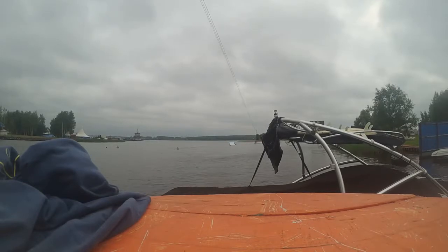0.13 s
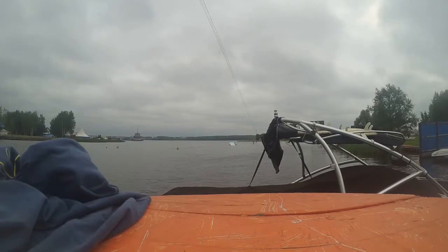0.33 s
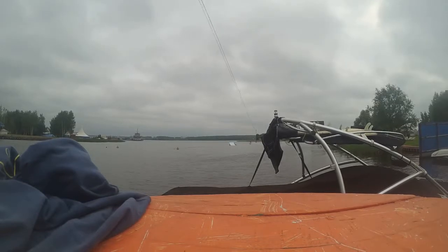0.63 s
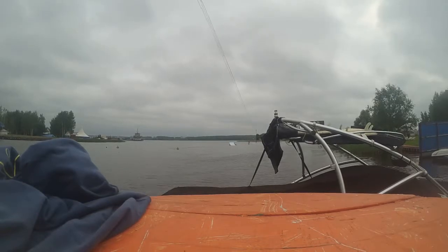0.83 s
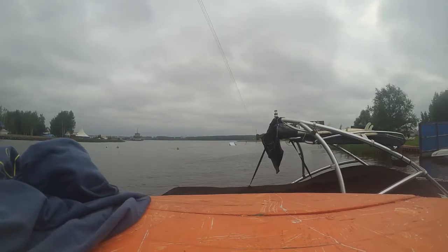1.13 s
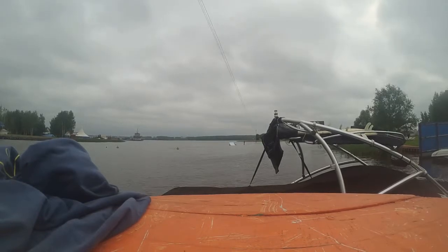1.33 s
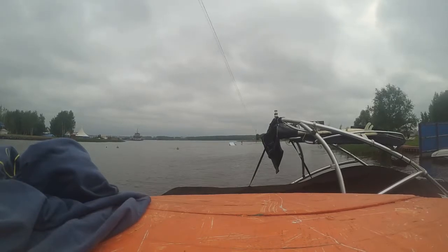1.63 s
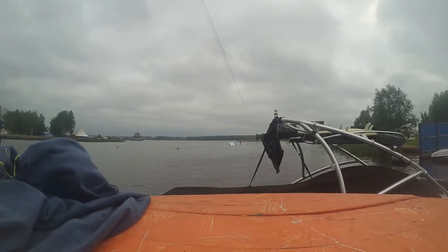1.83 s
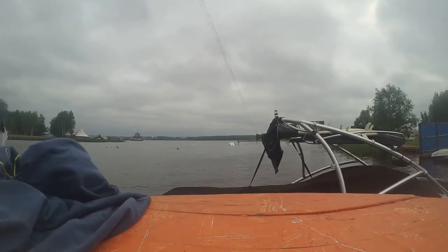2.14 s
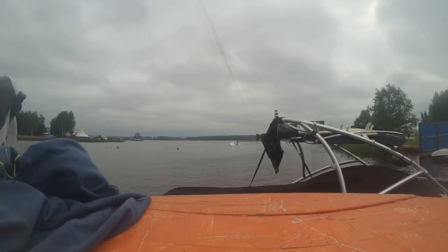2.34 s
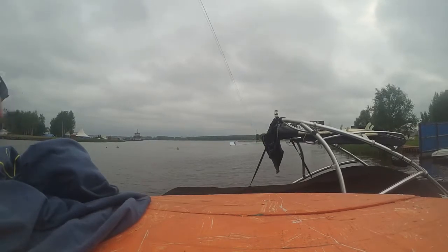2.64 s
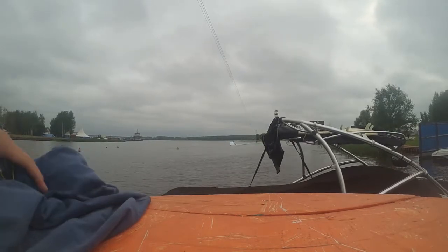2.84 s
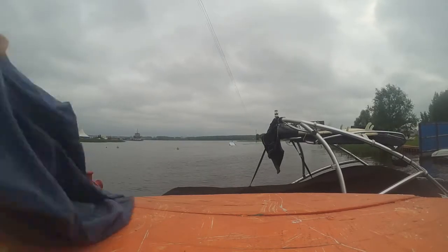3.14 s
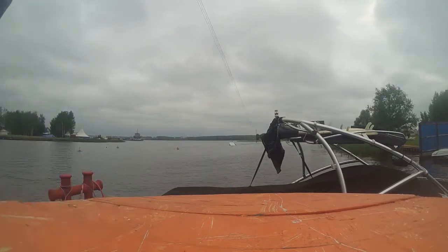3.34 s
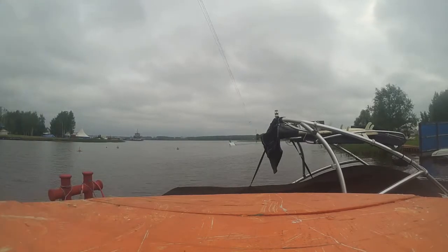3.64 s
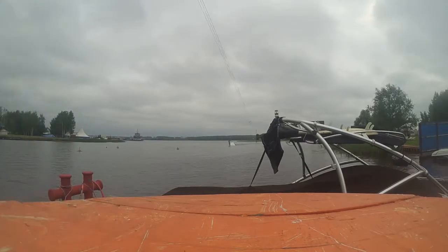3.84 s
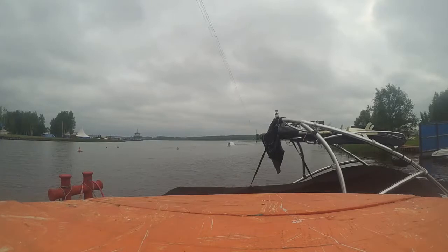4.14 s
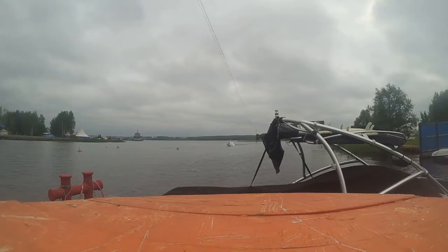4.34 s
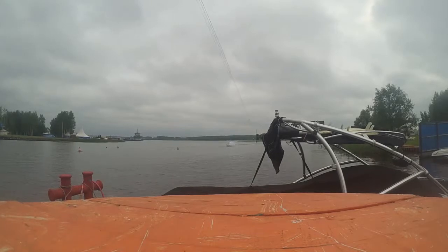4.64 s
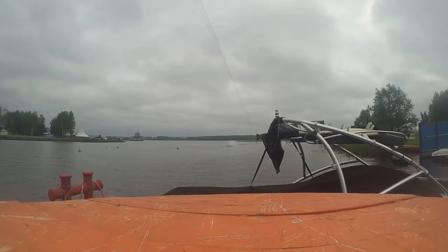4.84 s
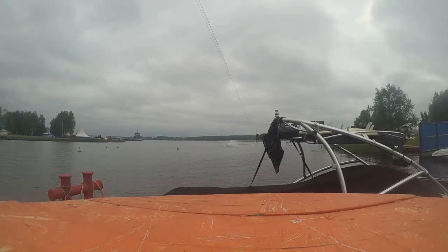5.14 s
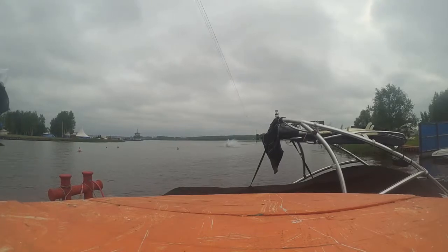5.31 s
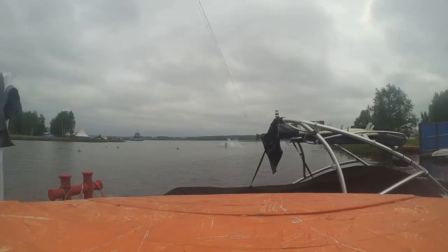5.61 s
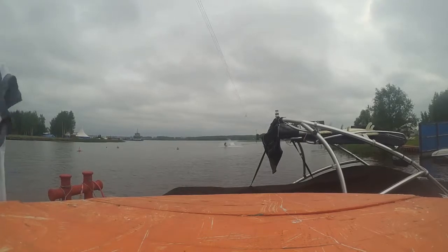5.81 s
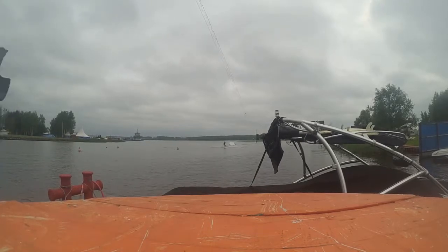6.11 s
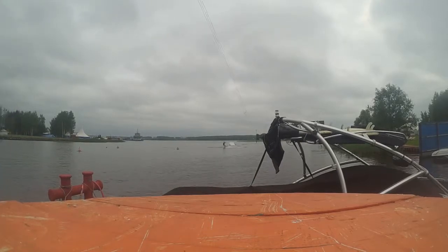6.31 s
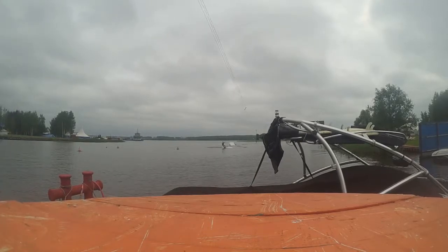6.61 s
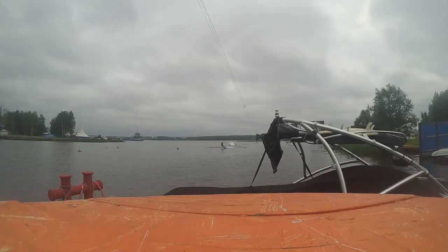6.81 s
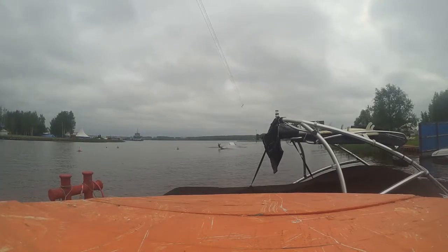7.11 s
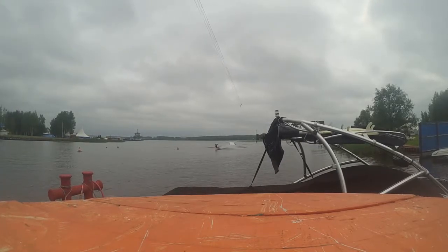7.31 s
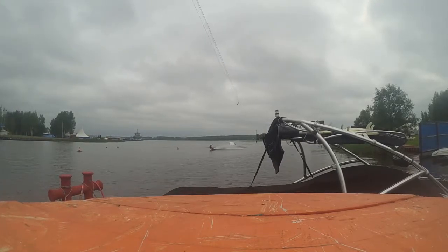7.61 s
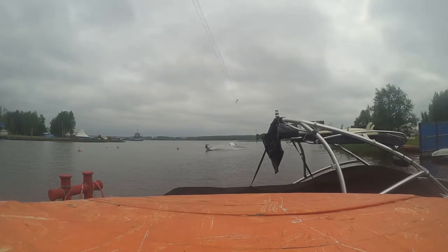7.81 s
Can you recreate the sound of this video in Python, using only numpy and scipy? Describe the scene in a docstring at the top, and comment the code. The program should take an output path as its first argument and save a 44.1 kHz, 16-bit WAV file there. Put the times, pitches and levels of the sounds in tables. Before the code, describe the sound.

Lake water booms and gulps under a hollow pontoon, with a low rumble, a brief cloth scrape and a few louder slaps.

```python
"""Lake water laps under a hollow floating pontoon, heard by a cased camera resting on its deck.
From the start, waves boom in the hull, trapped air gulps and the float rocks with a low rumble, over
lake hiss, ticking droplets and a thin electronic whine. Near 3 s a jacket is dragged off the deck: it
rasps, squeaks, catches and thumps. From 4 s the biggest waves slap the shell and the float knocks against
its mooring. Then the water settles: far spray swells, and softer booms and gulps close the scene."""
import sys
import numpy as np
from scipy import signal
from scipy.fft import rfft, irfft
from scipy.io import wavfile
from scipy.ndimage import uniform_filter1d

SR = 44100
rng = np.random.default_rng(int(sys.argv[2]) if len(sys.argv) > 2 else 0)


def put_to_file(sound):
    """Save the sound as 16-bit audio at rate SR, in the file named by the first command-line argument."""
    columns = np.atleast_2d(sound).T  # one column per channel
    safe = np.clip(columns, -1, 1)
    whole_steps = np.round(safe * 32767)
    wavfile.write(sys.argv[1], SR, whole_steps.astype(np.int16))


N = 350902
TIME = np.arange(N) / SR
FREQ = np.maximum(np.fft.rfftfreq(N, 1 / SR), .1)

# Event levels are cue levels; a function's trim_db settings ride on top of them.
# low booms of the float, from waves pushing under it and the jacket's thump near 3.3 s:
# start_s, push_s, hollow_db, hull_db, panel_db
BOOMS = [(0.275, 0.25, -53, -50.5, -56), (0.99, 0.22, -52, -56, -62), (1.145, 0.078, -41, -34.5, -41),
         (1.21, 0.13, -37, -48, -47), (1.32, 0.15, -43.5, -47, -50.5), (1.56, 0.13, -46.5, -48.5, -58),
         (1.892, 0.12, -59, -54, -66), (2.19, 0.069, -59, -56.5, -61), (2.33, 0.11, -52, -63, -73),
         (2.56, 0.12, -55, -56, -57), (2.8, 0.11, -50.5, -57.5, -61), (3.04, 0.28, -55, -59.5, -64),
         (3.29, 0.075, -46, -47, -47), (3.67, 0.016, -46, -62, -79), (3.99, 0.055, -46.5, -55, -63),
         (4.13, 0.045, -42, -42.5, -41.5), (4.26, 0.082, -47.5, -52, -67), (4.39, 0.058, -48.5, -43, -45),
         (4.51, 0.13, -36.5, -34, -24), (4.61, 0.2, -36, -33, -35), (4.85, 0.034, -46, -50, -69),
         (5.01, 0.039, -45, -61, -63), (5.208, 0.11, -43, -66, -55.5), (5.461, 0.098, -47, -71, -74),
         (6.18, 0.037, -55.5, -62, -74), (6.295, 0.1, -55.5, -53, -52), (6.459, 0.1, -46.5, -43.5, -54),
         (6.892, 0.1, -48, -50, -64), (6.98, 0.26, -42, -46.5, -61), (7.12, 0.11, -47, -43.5, -59),
         (7.775, 0.1, -50.5, -48.5, -54.5)]
# boom of the air inside the float: pitch_hz, width_hz, gain_db
HOLLOW_MODES = [(130.33, 8.9, -1), (153, 2.2, -13)]
# deep heave of the hull: pitch_hz, width_hz, gain_db
HULL_MODES = [(73.1, 8.9, 6), (96.2, 11.8, 0.78)]
# drumming of the panels: pitch_hz, width_hz, gain_db
PANEL_MODES = [(161.8, 13.8, -3.5), (191.6, 9.7, -2.5)]
# stiff ribs that speak under hard blows: pitch_hz, width_hz, gain_db
RIB_MODES = [(182, 29, 9), (206.7, 23.3, 1), (239, 210, -3)]
# squeezed air pockets: start_s, level_db, first_hz, last_hz, rise_s, hold_s, t60_s
GULPS = [(0.272, -41.5, 156, 135, 0.01, .016, .16), (0.412, -41, 162.7, 131.2, 0.0056, 0.014, 0.51),
         (1.157, -31.5, 186, 176.4, 0.0057, 0.034, 0.19), (1.182, -23, 144.4, 131.3, 0.014, 0.038, .09),
         (1.24, -22.5, 128.8, 132.4, 0.0074, .016, 0.33), (4.511, -30.5, 246, 217, 0.0091, 0.034, 0.044),
         (4.533, -22.5, 193, 215, 0.0055, 0.0275, 0.031), (4.581, -18.5, 229.5, 195, 0.014, 0.017, 0.073),
         (4.655, -33, 216, 190, .006, 0.038, 0.048), (4.727, -29, 224, 185, 0.0069, 0.029, 0.16),
         (4.739, -29, 137, 117, 0.011, 0.026, 0.075), (6.292, -40.5, 102.3, 96.8, 0.026, 0.12, 0.3),
         (6.36, -35.5, 136, 129.7, 0.063, 0.2, 0.2), (6.88, -38, 132.7, 127, 0.039, 0.1, .1),
         (6.975, -35.5, 132, 128.8, 0.014, 0.073, 0.35), (7.119, -41.5, 137.7, 130.2, 0.015, 0.15, 0.21),
         (7.775, -32, 126, 130.2, 0.025, 0.12, 0.2)]
# rolls as a swell passes under: start_s, length_s, level_db
ROLLS = [(0.26, 0.22, -33), (0.85, 0.14, -40), (1.18, 0.49, -37), (1.6, 0.16, -30.5), (2.2, 0.19, -40.5),
         (2.95, 0.29, -45), (5.33, 0.31, -42.5), (5.8, 0.23, -46.5), (6.95, .9, -46.5)]
# jolts that swing the whole float: start_s, level_db, pitch_hz, t60_s
JOLTS = [(0.293, -18, 30.2, 0.3), (0.412, -22, 33.7, 0.33), (1.37, -40, 29.3, 1), (1.616, -20, 29.7, 0.27),
         (1.652, -24.5, 31, 0.19), (3.345, -40, 38, 0.89), (4.143, -25.5, 34.8, 0.3),
         (4.228, -34, 36.54, 3.2), (4.56, -39, 37, 1), (5.865, -32, 25.2, 0.22), (6.449, -46, 40.3, 0.54)]
# sharp hits on the shell, from water slaps and the jacket catching on the deck near 3.3 s:
# start_s, crack_db, thump_db, t60_s, cutoff_hz
SHELL_HITS = [(0.35, -50.5, -63, 0.068, 1240), (1.166, -48.5, -39, 0.14, 1400),
              (1.655, -52, -40.5, 0.067, 1120), (1.76, -50.5, -48, 0.078, 1180),
              (1.811, -54, -54, 0.013, 1800), (1.921, -54.5, -67, 0.025, 1600),
              (1.977, -51.5, -64, 0.012, 1700), (3.279, -56, -57, 0.015, 2000),
              (3.293, -43, -42.5, 0.04, 2600), (3.325, -52.5, -45, 0.089, 1500),
              (4.02, -45.5, -53, 0.074, 2000), (4.046, -45, -45, 0.029, 1640),
              (4.098, -34, -66, 0.062, 3500), (4.115, -35.5, -37.5, 0.055, 3800),
              (4.144, -34.5, -54, 0.049, 2820), (4.166, -38, -56, 0.042, 1990),
              (4.405, -44.5, -47, 0.1, 1700), (4.511, -35.5, -45, 0.072, 1490),
              (4.534, -37, -39, 0.066, 1490), (4.546, -26.5, -26, 0.054, 1400),
              (4.574, -35, -45, 0.037, 1287), (4.597, -35, -34, 0.036, 1410),
              (4.617, -37.5, -25, 0.05, 1500), (4.656, -36, -39, 0.091, 1310),
              (4.723, -41.5, -35, 0.097, 1900), (4.789, -51, -45, 0.016, 1400)]
# ring of the struck shell: pitch_hz, width_hz, gain_db
SHELL_MODES = [(292.5, 23, 6.5), (546, 40, 3.5), (656, 44, -3), (837, 28, 4.5), (970, 117, 6.5),
               (1050, 55, -4), (1254, 62, -2.5), (1377, 49, -0.5), (1700, 190, -21), (2130, 92, -5.5),
               (2830, 180, -11)]
# bumps against the mooring: start_s, hollow_db, shell_db
KNOCKS = [(0.353, -60, -45), (1.658, -53, -47), (1.762, -53.5, -45.5), (4.046, -53, -40), (4.549, -30, -22),
          (4.726, -32, -49)]
# hollow ring of a bump: pitch_hz, width_hz, gain_db
KNOCK_MODES = [(282, 9.5, 14.5), (520, 36, 4.5), (1374, 51, -1)]
# water churning on the shell: start_s, length_s, level_db
CHURNS = [(0.36, .18, -67), (1.16, .02, -59), (3.99, 0.33, -62), (4.39, 0.17, -56.5), (4.52, .1, -43.5)]
# the jacket's drag and its sharper tugs: start_s, length_s, level_db
SCRAPES = [(2.97, .08, -69.5), (3.05, 0.32, -62.5), (3.095, 0.036, -61.5), (3.158, 0.027, -54.5),
           (3.235, .025, -61), (3.274, .01, -58)]
# rasp of the sliding cloth: pitch_hz, width_hz, gain_db
RASP_MODES = [(850, 150, 0), (1037, 190, 6.5), (1217, 90, -1), (1430, 110, -7), (1640, 95, -3.5),
              (2120, 160, -7.5)]
# the cloth catching on the deck: start_s, length_s, level_db, first_hz, last_hz
SQUEAKS = [(3.052, 0.076, -58, 1032, 1084), (3.095, 0.038, -57, 886, 800), (3.161, 0.033, -59, 1022, 1060),
           (3.161, 0.027, -56, 1660, 1540), (3.185, .055, -65, 2150, 2120), (3.218, 0.044, -64, 1030, 1070),
           (3.316, 0.03, -50, 1004, 1056), (3.337, .05, -60, 1040, 940)]
# plinking droplets: start_s, peak_db, pitch_hz, t60_s
DROPS = [(0.063, -53, 2980, 0.027), (0.185, -54, 2940, 0.033), (0.543, -55, 2960, .04),
         (1.082, -52, 3000, 0.017), (1.587, -57, 2870, .02), (2.162, -52, 3040, .025),
         (2.223, -55, 3060, 0.023), (2.652, -51, 2930, 0.028), (3.21, -57, 2850, .04),
         (3.244, -55, 2780, 0.035), (3.294, -55, 4000, .03), (4.116, -54, 3900, .04),
         (4.21, -50, 4820, .035), (4.22, -49.5, 2780, .03), (4.264, -55, 2800, .02),
         (4.803, -49.5, 3000, 0.043), (5.223, -52.5, 3015, 0.055), (5.883, -49.5, 2950, 0.027),
         (6.245, -52, 2930, .02), (6.654, -52, 3080, .02), (7.02, -52, 2930, 0.037),
         (7.264, -52, 3040, .025), (7.462, -52.5, 2900, .02)]
# drizzle ticking on the case: start_s, peak_db
TICKS = [(0.063, -52), (0.544, -52), (1.045, -50), (1.084, -55), (1.45, -57), (1.584, -55), (2.651, -51),
         (3.728, -52.5), (4.262, -52), (4.389, -59), (5.102, -54), (5.338, -54), (6.245, -52), (7.015, -53)]
# ring of a tick: pitch_hz, width_hz, gain_db
TICK_MODES = [(6100, 720, -6), (7080, 690, -1), (8460, 830, -3.5), (10800, 3400, -7)]
# EQ of the open lake's hiss: frequency_hz, gain_db
LAKE_EQ = [(100, 15.5), (330, -3), (750, -8.5), (1100, -1), (1700, -10.5), (2450, -10.5), (3900, -2),
           (4900, -1), (5500, -9.5), (7500, -12.5), (9300, -19.5), (15000, -37.5)]
# EQ of the spray: frequency_hz, gain_db
SPRAY_EQ = [(300, -20.5), (1100, -9.5), (1700, -13), (2500, -7.5), (3100, -12), (3900, 2.5), (4900, 0),
            (5500, -9), (6300, -6), (7500, -16), (9300, -15.5), (15000, -27.5)]
# fader curve of the far spray: time_s, level_db
FAR_SPRAY = [(0, -65.5), (1.0, -75.5), (2.9, -70), (3.25, -66), (3.6, -71.5), (4.7, -72.5), (5.4, -66.5),
             (5.9, -61.5), (6.5, -62), (7.25, -67.5), (7.7, -59.5), (7.96, -60)]
# spray falling back after the big waves: start_s, length_s, level_db
NEAR_SPRAY = [(4.18, 0.11, -62), (4.82, 0.1, -61)]
# stereo width of the hiss: frequency_hz, side_minus_mid_db
HISS_WIDTH = [(300, -25.5), (1400, -41.5), (2300, -38), (4000, -32), (6000, -20), (10000, -14.5),
              (14000, -14)]
# resonances of the camera case: centre_hz, width_hz, lift_db
CASE_EQ = [(417, 5.3, 17.5), (463.5, 13, 10.5), (548, 29.4, 13.5), (635, 15.6, 14.5), (990, 220, 8.5),
           (1205, 20, 12.5), (1443, 146, 15), (1840, 180, 6), (1955, 62, 10), (2140, 57, 8.5),
           (2906, 430, 10), (3770, 33, 7), (4630, 250, -5.5), (4895, 430, 5.5), (6880, 220, -2),
           (7340, 410, 9.5), (8840, 430, 1)]
# fader curve of the whine's strongest tone: time_s, rms_db
WHINE_FADER = [(0, -63), (1.05, -65.5), (1.35, -68), (1.75, -65.5), (2.15, -72.5), (2.7, -66.5),
               (3.55, -67), (3.7, -70.5), (4.15, -71.5), (4.55, -66.5), (4.95, -67.5), (5.35, -63.8),
               (6, -64), (7.15, -66.5), (7.7, -65), (7.96, -66.5)]
# the whine's weaker tones: pitch_hz, rms_db
WHINE_TONES = [(3978, -85), (4328, -85), (4409, -75), (4583, -83), (4665, -87), (4792, -84), (4872, -74.5),
               (5044, -84), (5335, -86), (5416, -87), (5590, -88), (6282, -86), (7434, -91), (9916, -83),
               (10088, -86.5), (10174, -88.5), (10460, -94), (10928, -94)]


def booming(hull_trim_db=-1, panel_trim_db=-3, hard_db=-21, slosh_db=1.73, slosh_hz=7):
    """Waves and one jacket thump drive the float's air, hull and panels; hard blows ring its ribs."""
    def ringing(modes):
        return steadied(filtered(noise(), body(modes, order=2)), span_s=0.028)
    def drive(levels_db, t60_s, ripple_db):  # small ripples keep it sounding between booms
        pushes = swells(zip(start_s, push_s, levels_db), rise_s=0.024, t60_s=t60_s)
        return np.hypot(pushes, undb(ripple_db))
    start_s, push_s, hollow_db, hull_db, panel_db = np.transpose(BOOMS)
    push = drive(hollow_db, t60_s=0.46, ripple_db=-61.5)
    heave = drive(hull_db, t60_s=0.38, ripple_db=-68)
    drum = drive(panel_db, t60_s=0.15, ripple_db=-73)
    boom = push * ringing(HOLLOW_MODES) + undb(hull_trim_db) * heave * ringing(HULL_MODES)
    hardness = np.sqrt(drum / (drum + undb(hard_db)))
    panels = (1 - hardness) * ringing(PANEL_MODES) + hardness * ringing(RIB_MODES)
    drumming = undb(panel_trim_db) * drum * panels
    slosh = undb(slosh_db * wobble(body([(slosh_hz, 9, 0)], order=2)))
    return filtered(slosh * boom + drumming, np.abs(lowpass(hz=268, order=10)))


def gulps(glide_s=0.022, flutter_db=0.6, jitter=0.011):
    """A trapped air pocket rings while the water squeezes it, its wavering pitch gliding to rest."""
    out, t = np.zeros(N), TIME[:SR]
    restless = wobble(body([(37.2, 30, 0)], order=2))
    for start_s, db, first_hz, last_hz, rise_s, hold_s, t60_s in GULPS:
        flutter, waver = shifted(restless)[:SR], shifted(restless)[:SR]
        glide_hz = last_hz + (first_hz - last_hz) * np.exp(-t / glide_s)
        squeeze = (1 - np.exp(-(t / rise_s) ** 2)) * fading(np.maximum(t - hold_s, 0), t60_s)
        tone = sine(glide_hz * (1 + jitter * waver))
        add(out, start_s, undb(db + flutter_db * flutter) * squeeze * tone)
    return out


def rocking(roll_trim_db=-2, calm_db=-50, jolt_rise_s=0.015):
    """The float wallows in the sub-bass with each roll and swings on its lowest mode after a jolt."""
    wallow = filtered(noise(), body([(6.4, 6.9, 0)]) * lowpass(hz=26.6, order=2))
    roll = np.hypot(swells(ROLLS, rise_s=0.045, t60_s=1.6), undb(calm_db))
    out = undb(roll_trim_db) * roll * steadied(wallow, span_s=0.23)
    t = TIME[:2 * SR]
    attack = 1 - np.exp(-(t / jolt_rise_s) ** 2)
    for start_s, db, hz, t60_s in JOLTS:
        add(out, start_s, undb(db) * attack * fading(t, t60_s) * np.sin(2 * np.pi * hz * t))
    return out


def shell_hits(shell, thump_trim_db=-2):
    """A water slap or a catch of the jacket cracks on the shell, duller if soft, and thumps the ribs."""
    crack = irfft(shell, N)[:SR // 4]
    thump = irfft(body(RIB_MODES) * body([(202, 590, 0)]) * lowpass(hz=283, order=4), N)
    out = np.zeros(N)
    for start_s, crack_db, thump_db, t60_s, cutoff_hz in SHELL_HITS:
        softened = signal.sosfilt(signal.butter(4, cutoff_hz, fs=SR, output="sos"), crack)
        add(out, start_s, undb(crack_db) * strike(softened, t60_s, rise_s=0.0029))
        add(out, start_s, undb(thump_db + thump_trim_db) * strike(thump, t60_s=0.0021))
    return out


def knocks(shell):
    """A bump on the mooring is one short push that rings the shell and leaves the hull ringing hollow."""
    def ring(response):
        impulse = irfft(response * lowpass(hz=1530, order=6), N)[:SR // 2]
        return impulse / np.abs(impulse).max()
    hollow = ring(body(KNOCK_MODES) * body([(557, 1000, 0)]))
    crack = ring(shell * body([(960, 430, 0)]))
    out = np.zeros(N)
    for start_s, hollow_db, shell_db in KNOCKS:
        add(out, start_s, undb(hollow_db) * hollow + undb(shell_db) * crack)
    return out


def churning(shell, trim_db=-3):
    """Churning water rattles the shell with a stream of tiny hits."""
    rattle = filtered(grains(per_s=980, spread_db=-1), shell * lowpass(hz=1630, order=4))
    return undb(trim_db) * swells(CHURNS, rise_s=0.01, t60_s=0.32) * steadied(rattle, span_s=0.043)


def jacket_drag(trim_db=-1):
    """Cloth rasps over the deck in dense little slips."""
    rasp = filtered(grains(per_s=420, spread_db=-2.5), body(RASP_MODES, order=2))
    return undb(trim_db) * swells(SCRAPES, rise_s=0.0068, t60_s=0.16) * steadied(rasp, span_s=0.032)


def jacket_squeaks(trim_db=-2, jitter=0.033):
    """The cloth catches on the deck and sings briefly on a shaky, sliding pitch."""
    out, unsteady = np.zeros(N), wobble(lowpass(hz=220, order=2))
    for start_s, length_s, db, first_hz, last_hz in SQUEAKS:
        along = np.linspace(0, 1, int(length_s * SR))
        shake = 1 + jitter * unsteady[int(start_s * SR):][:len(along)]
        glide_hz = first_hz + (last_hz - first_hz) * along
        add(out, start_s, undb(db + trim_db) * np.sin(np.pi * along) * sine(glide_hz * shake))
    return out


def droplets(fizz_db=-80):
    """Single drops plink briefly, with a faint fizz between them."""
    response = body([(2985, 230, 2.0), (7370, 610, -10)], order=2)
    out = undb(fizz_db) * unit(filtered(grains(per_s=70, spread_db=0.6), response))
    for start_s, db, hz, t60_s in DROPS:
        ring = irfft(body([(hz, 380, 0)], order=2), N)
        add(out, start_s, undb(db) * strike(ring, t60_s))
    return out


def drizzle(patter_db=-82):
    """Fine drops tick on the case: a few clear ones in a faint random patter."""
    response = body(TICK_MODES, order=2) * lowpass(hz=10000, order=6)
    out = undb(patter_db) * unit(filtered(grains(per_s=79, spread_db=-4.5), response))
    ring = irfft(response, N)
    for start_s, db in TICKS:
        add(out, start_s, undb(db) * strike(ring, t60_s=0.01))
    return out


def lake(bed_db=-62.5, spray_trim_db=1):
    """Distant water hisses; far spray swells slowly and near spray falls back after the big waves."""
    far = undb(np.interp(TIME, *np.transpose(FAR_SPRAY)))
    near = swells(NEAR_SPRAY, rise_s=0.1, t60_s=0.39)
    bed = undb(bed_db) * cased_hiss(LAKE_EQ)
    return bed + undb(spray_trim_db) * np.hypot(far, near) * cased_hiss(SPRAY_EQ)


def cased_hiss(eq):
    """Stereo noise coloured by an EQ and by the camera case, widest in the treble."""
    def curve(points):
        hz, db = np.transpose(points)
        return undb(np.interp(np.log(FREQ), np.log(hz), db))
    case = undb(sum(db / (1 + (2 * (FREQ - hz) / width_hz) ** 2) for hz, width_hz, db in CASE_EQ))
    mid = filtered(noise(), case * curve(eq))
    side = filtered(noise(), case * curve(eq) * curve(HISS_WIDTH))
    return np.array([mid + side, mid - side]) / mid.std()


def whine(main_hz=5130, wander_rad=0.32, waver_db=1):
    """The camera's electronics sing thin tones: the strongest swells and sinks, the others waver."""
    def tone(hz, db):
        return np.sqrt(2) * undb(db) * np.sin(2 * np.pi * hz * TIME + wander_rad * shifted(wander))
    wander, waver = wobble(lowpass(hz=2.2, order=2)), wobble(lowpass(hz=1.5, order=2))
    main = tone(main_hz, np.interp(TIME, *np.transpose(WHINE_FADER)))
    return main + sum(tone(hz, db + waver_db * shifted(waver)) for hz, db in WHINE_TONES)


def undb(db):
    """Decibels to gain."""
    return 10 ** (np.asarray(db) / 20)


def unit(x):
    """Scale to rms 1."""
    return x / np.sqrt(np.mean(x ** 2))


def noise():
    """White noise."""
    return rng.standard_normal(N)


def sine(hz):
    """Oscillator that follows a pitch curve."""
    return np.sin(2 * np.pi * np.cumsum(hz) / SR)


def wobble(response):
    """Random modulator with a given spectrum, rms 1."""
    return unit(filtered(noise(), response))


def shifted(x):
    """Loop a modulator from a random point."""
    return np.roll(x, rng.integers(N))


def filtered(x, response):
    """Apply a frequency response."""
    return irfft(rfft(x) * response, N)


def body(modes, order=1):
    """Response of resonances (pitch_hz, width_hz, gain_db); order 2 gives steep skirts."""
    return sum(undb(db) / (1 + 1j * (FREQ / hz - hz / FREQ) * hz / width) ** order
               for hz, width, db in modes)


def lowpass(hz, order):
    """Response of a causal low-pass."""
    return signal.freqs(*signal.butter(order, 1, analog=True), FREQ / hz)[1]


def steadied(x, span_s):
    """Even out the slow swells of a noise, rms near 1."""
    power = uniform_filter1d(np.abs(signal.hilbert(x)) ** 2 / 2, int(span_s * SR))
    return x / np.sqrt(power + 1e-3 * power.mean())


def fading(t, t60_s):
    """Exponential decay, 60 dB in t60_s."""
    return np.exp(-np.log(1000) * t / t60_s)


def swells(events, rise_s, t60_s):
    """Envelope of events that rise, hold and die away; their powers add."""
    power = np.zeros(N)
    for start_s, length_s, db in events:
        attack = np.clip((TIME - start_s) / rise_s, 0, 1)
        release = fading(np.clip(TIME - start_s - length_s, 0, 2 * t60_s), t60_s)
        power += (undb(db) * attack * release) ** 2
    return np.sqrt(power)


def strike(ring, t60_s, rise_s=0, size=8192):
    """A burst of contact noise through a body's impulse response, peak 1."""
    t = TIME[:size]
    contact = np.minimum((t + 1 / SR) / (rise_s + 1 / SR), 1) * fading(t, t60_s)
    hit = signal.fftconvolve(rng.standard_normal(size) * contact, ring[:size])[:size]
    return hit / np.abs(hit).max()


def grains(per_s, spread_db):
    """Sparse random clicks of uneven size."""
    clicks = (rng.random(N) < per_s / SR) * noise()
    return clicks * undb(spread_db * np.minimum(rng.exponential(size=N), 4))


def add(out, start_s, x):
    """Mix a sound in at start_s."""
    start = int(start_s * SR)
    out[start:start + len(x)] += x[:N - start]


def scene():
    """Everything sits dead centre except the lake's hiss and spray."""
    shell = body(SHELL_MODES) * body([(970, 3200, 0)])
    deck = booming() + gulps() + rocking() + shell_hits(shell) + knocks(shell)
    deck += jacket_drag() + churning(shell) + jacket_squeaks()
    return deck + lake() + droplets() + drizzle() + whine()


def record(dry):
    """The microphone adds its own faint noise, and the camera cuts the top above 15.2 kHz."""
    self_noise = undb(-75.8) * noise()
    top_cut = signal.ellip(10, .1, 80, 15200, fs=SR, output="sos")
    return signal.sosfilt(top_cut, dry + self_noise)


dry = scene()
out = record(dry)
put_to_file(out)
```